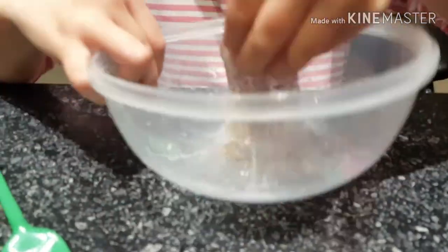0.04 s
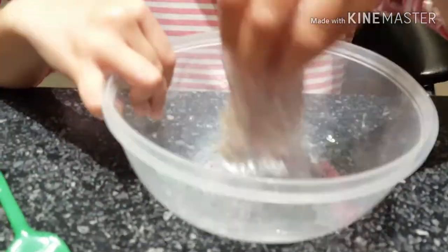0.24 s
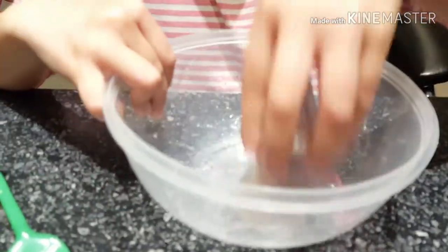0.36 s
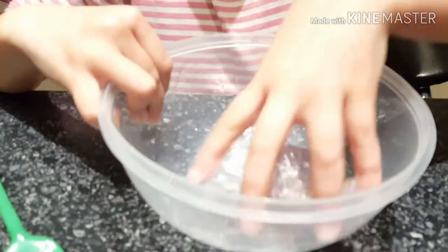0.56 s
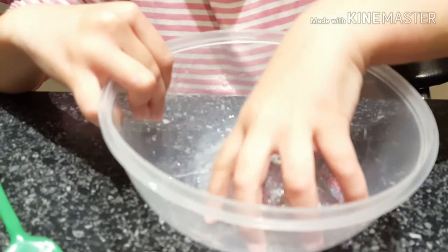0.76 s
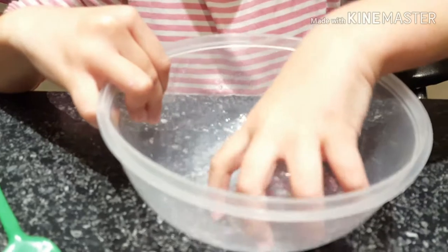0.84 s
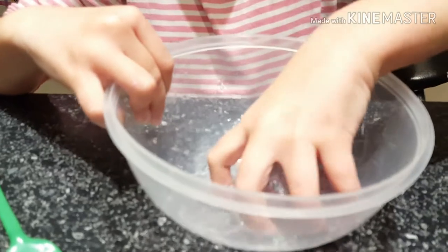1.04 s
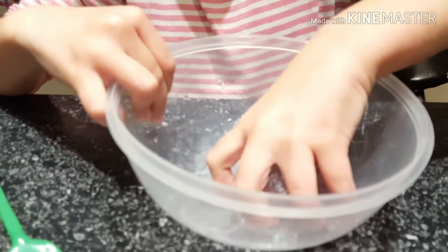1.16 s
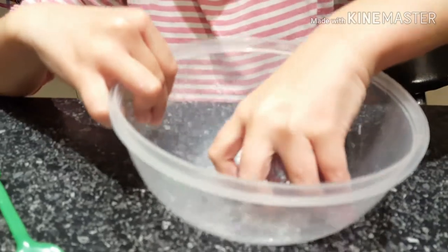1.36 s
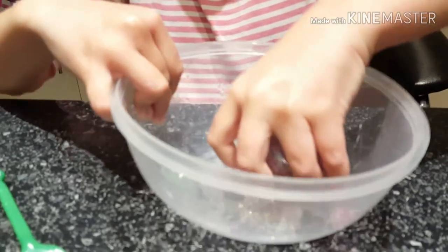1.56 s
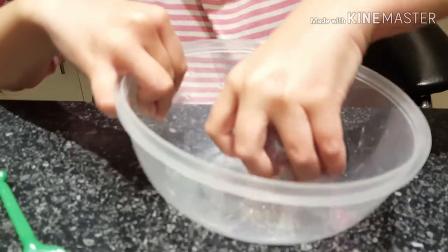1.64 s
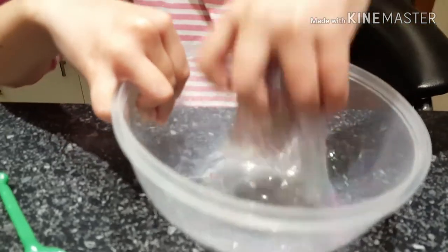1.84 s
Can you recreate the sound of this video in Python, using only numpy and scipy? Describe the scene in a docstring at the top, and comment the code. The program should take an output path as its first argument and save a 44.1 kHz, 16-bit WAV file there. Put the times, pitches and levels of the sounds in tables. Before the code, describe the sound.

Slime is kneaded by hand in a plastic bowl on a stone counter, heard close in a lively room with very faint hush. Faint pops and a thin squeaky squelch lead to a loud, hollow pop at 0.22 s with a low thump. Soft rubbing and sticky crackle follow, with small pops near 0.8, firmer ones at 1.0 and 1.6, then wet squelches from 1.8 over rising crackle.

```python
"""A hand kneads soft slime in a plastic bowl on a stone counter, in a bare, lively room with a low hush.
Two faint pops lead to a wet squelch with a thin squeak; then the loudest pop rings the bowl and thumps
its base, and the rub and crackle of kneading swell. Softer pops, presses and squelches follow, firmer
near 1.0 and 1.6 s, up to a last run of squelches over rising crackle. Pops are damped sines with noise
ticks and struck modes; squelches are bubble blips and filtered grains; rub and hush are filtered noise."""
import sys
import numpy as np
from scipy import signal
from scipy.fft import rfft, irfft, next_fast_len
from scipy.io import wavfile

SR = 44100
rng = np.random.default_rng(int(sys.argv[2]) if len(sys.argv) > 2 else 0)


def to_wav(s):
    """Save 16-bit WAV."""
    ch = np.atleast_2d(s).T  # columns
    pcm = np.round(np.clip(ch, -1, 1) * 32767)  # PCM
    wavfile.write(sys.argv[1], SR, pcm.astype(np.int16))


N = 83790  # length in samples

# All t60 values and lives in cycles run to -60 dB.
BURST_S = 0.007  # a short sound at 0 dB has the energy of this long at rms 1
POP_CYCLES = 5.9
SCATTER_DB, SCATTER_T60_S = 12, 0.023  # echoes inside the bowl, relative to the pop
TICK_T60_S = 0.016
DIRECT_TICK_DB, DIRECT_T60_S = 0, 0.0047  # first crack, alike in both ears, relative to the wide tick
BASE_TOP_HZ = 700  # the bowl's base rings below this, its wall above
MODE_SCATTER_DB, MODE_SCATTER_RAD = 5.5, 0.84  # the phase scatter narrows where the ears are alike
BOWL_RISE_S, THUMP_RISE_S, PRESS_RISE_S = 0.00069, 0.009, 0.0067
WALL_ECHO_DB, WALL_ECHO_SPAN_S = -20.5, (0.006, 0.036)  # all echoes together; earliest and latest
BUBBLES_PER_S, BUBBLE_CYCLES, BUBBLE_SPREAD = 1500, 12.8, 0.09  # spread: pitch scatter as a share
GRAINS_PER_S, GRAIN_SPREAD_DB = 4000, -1
SQUEAK_WIDTH_HZ, SQUEAK_EDGE_S = 125, 0.0078  # distance from pitch to half amplitude; fade at each end
HUSH_DB = -69.5
ROOM_DB, ROOM_RISE_S = -4.5, 0.0034  # level ahead of the room's colour
LOW_CUT_HZ, TOP_HZ = 46, 15500

# left-right likeness of diffuse sound: f/Hz, likeness (1 = the same in both ears)
ALIKE = [(100, 0.83), (250, 0.73), (500, 0.45), (1000, 0.2), (4000, 0.13), (10000, 0.12)]


def pops():
    """Each pocket snaps open, echoes inside the bowl, rings its wall and base and thumps the counter."""
    # air pockets bursting: t/s, pop pitch f/Hz, pop level/dB, treble tick level/dB, tick roll-off f/Hz,
    # wall ring level/dB, base knock level/dB, counter thump level/dB, left-right level/dB
    pockets = [(0.0606, 1490, -47, -55, 15500, -72, -73, -89, 2.5),
               (.1795, 1670, -52.5, -62, 15000, -71, -56, -77, -1),
               (0.2248, 2850, -20.5, -30.5, 14900, -18.5, -19.5, -21.5, 0.5),
               (0.2385, 3500, -37, -58, 10000, -63, -24.5, -35, 2.5),
               (.437, 3000, -54, -68, 9000, -53.5, -49, -52.5, 0),
               (0.4968, 2930, -47, -62, 11000, -57.5, -50, -49, -1.5),
               (0.787, 3340, -43.5, -56.5, 9000, -49, -54, -46, -4),
               (0.8393, 3600, -40.5, -48, 10000, -44, -43, -36, 1.5),
               (.886, 1470, -52.5, -63, 10000, -55, -56, -51, -6.5),
               (1.0197, 3710, -35, -41, 8540, -31, -35, -41.5, 1),
               (1.0454, 2440, -44.5, -57, 9000, -48.5, -43, -41.5, 1.5),
               (1.214, 3300, -53, -67, 9000, -56, -57, -43, 1),
               (1.229, 3460, -54, -77, 9010, -54.5, -62, -46.5, -2),
               (1.2686, 3160, -54.5, -59, 13900, -83, -63, -54, 1),
               (1.363, 2080, -59, -71, 7000, -60, -58.5, -60, 4),
               (1.5113, 1970, -54, -65.5, 10100, -56, -56.5, -55.5, -2),
               (1.6015, 3020, -33, -48.5, 5240, -34, -30, -32, 1),
               (1.617, 2800, -43.5, -55, 6000, -55, -37, -37, -5.5),
               (1.6247, 6400, -59, -56, 15000, -47, -72, -75, 6),
               (1.738, 2330, -51, -66.5, 7950, -51.5, -52.5, -53, -1)]
    # colour of the treble tick: f/Hz, level/dB
    tick_colour = [(1000, -54), (4000, -5), (6300, 1.5), (10000, 3), (13000, -3), (16000, -4)]
    # modes of the bowl, damped by slime, ahead of the grip: f/Hz, relative level/dB, t60/s
    bowl_modes = [(225, -16.5, 0.21), (303.6, -0.5, 0.078), (369, 1.5, 0.08), (479, -2.5, 0.05),
                  (516, -12, 0.083), (590, -1.5, 0.04), (861, -16, 0.18), (936, -3, 0.13), (1010, 3, 0.11),
                  (1062, -1.5, 0.2), (1263, -11.5, 0.065), (1420, -11, 0.13), (2254, -9, 0.1),
                  (2496, 6.5, 0.013), (3243, -14.5, 0.078)]
    # the hand damping the bowl: t/s, how many times faster its ring dies
    grip_curve = [(.2, 1), (1.0, 2.6), (1.6, 1.88)]
    # colour the bowl's cavity gives a pop: f/Hz, level/dB
    cavity = [(100, 3), (500, 5), (1400, 5.5), (1900, 1.5), (2400, 4), (3300, -0.5), (4300, 6),
              (5100, -0.5), (6200, 3), (9000, -20), (16000, 17)]
    out = np.zeros((2, N))
    t = np.arange(SR // 2) / SR

    def dying_noise(t60):
        """Two unrelated noises, left and right, fading away exponentially."""
        return rng.standard_normal((2, len(t))) * amp(-60 * t / t60)

    for s, hz, pop_db, tick_db, top_hz, wall_db, base_db, thump_db, pan_db in pockets:
        grip = np.interp(s, *np.transpose(grip_curve))
        modes = [(f, db, t60 / grip) for f, db, t60 in bowl_modes]
        base = [m for m in modes if m[0] < BASE_TOP_HZ]
        wall = [m for m in modes if m[0] >= BASE_TOP_HZ]

        pop = -ring(t, hz, POP_CYCLES / hz)
        echoes = signal.fftconvolve(dying_noise(SCATTER_T60_S), pop[None], axes=1)[:, :len(t)]
        pop_in_bowl = coloured(burst(pop) + amp(SCATTER_DB) * burst(echoes), cavity)
        snap = amp(pop_db) * burst(pop_in_bowl)

        wide_crack = burst(spread(dying_noise(TICK_T60_S)))
        direct_crack = amp(DIRECT_TICK_DB) * burst(dying_noise(DIRECT_T60_S)[0])
        tick = filtered(wide_crack + direct_crack,
                        lambda f: amp(along(tick_colour, f)) / np.sqrt(1 + (f / top_hz) ** 4))

        body = amp(wall_db) * bowl(t, wall) + amp(base_db) * bowl(t, base)
        body = body + amp(thump_db) * thump(t, THUMP_RISE_S)
        sound = near_walls(snap + amp(tick_db) * burst(tick)) + body
        pan = amp([[pan_db / 2], [-pan_db / 2]])
        add(out, in_room(sound) * pan, s)
    return out


def bowl(t, modes):
    """Modes struck anew: level and phase differ a little from blow to blow and from ear to ear."""
    out = np.zeros((2, len(t)))
    for k, (hz, db, t60) in enumerate(modes):
        size, phase = rng.standard_normal((2, 2, 1))
        turn = MODE_SCATTER_RAD * (1 - along(ALIKE, hz)) * phase
        level = amp(db + MODE_SCATTER_DB * size - 60 * t / t60)
        out += (-1) ** k * level * np.sin(2 * np.pi * hz * t + turn)  # neighbours start in opposite phase
    return burst(out * (1 - np.exp(-t / BOWL_RISE_S)))


def thump(t, rise_s):
    """The low boom of the bowl pushed against the counter: damped sines with a soft onset."""
    # modes of bowl and counter together: f/Hz, relative level/dB, t60/s
    counter = [(117, 2.5, 0.067), (140.1, 0, 0.087)]
    boom = -sum(amp(db) * ring(t, hz, t60) for hz, db, t60 in counter)
    return burst(boom * (1 - np.exp(-t / rise_s)))


def near_walls(x):
    """x with eight distinct early echoes from nearby walls, at random delays and gains."""
    out = x.copy()
    delays = rng.uniform(*WALL_ECHO_SPAN_S, 8)
    echo_gains = rng.standard_normal((8, 2, 1)) / np.sqrt(8)
    for delay, gains in zip(delays, echo_gains):
        i = max(round(delay * SR), 1)
        out[:, i:] += amp(WALL_ECHO_DB) * gains * x[:, :-i]
    return out


def squelches():
    """Short swells of tiny bubbles, wet squish and fizz as the fingers close."""
    # slime squeezed between fingers: centre t/s, swell width (standard deviation) t/s,
    # bubble pitch f/Hz, bubble level/dB, squish level/dB, fizz level/dB
    squeezes = [(0.195, 0.0057, 725, -51.5, -49, -52), (0.22, 0.008, 1070, -40.5, -43.5, -52.5),
                (0.531, 0.0057, 3560, -57.5, -68, -68), (.602, 0.0064, 3570, -62, -55.5, -69),
                (.864, 0.0074, 3220, -52, -51, -52.5), (1.174, 0.013, 3530, -61, -72, -64),
                (1.2, 0.0072, 3440, -57.5, -52, -63), (1.233, 0.0095, 3430, -58, -56.5, -65),
                (1.385, 0.023, 2300, -70, -65.5, -71), (1.787, 0.0077, 1430, -56, -49.5, -66),
                (1.801, 0.0067, 1450, -48.5, -46, -56.5), (1.835, 0.01, 2960, -47.5, -48, -55),
                (1.896, 0.0059, 2950, -48, -43.5, -49)]
    # colour of the squish: f/Hz, level/dB
    squish_colour = [(100, -5), (400, -6), (700, 9), (1100, 1), (1550, 4.5), (2000, 0.5), (3200, -4),
                     (5000, -4.5), (8000, -21), (16000, -59)]
    # colour of the fizz: f/Hz, level/dB
    fizz_colour = [(500, -20), (3000, -7), (6000, -11.5), (11000, -1), (16000, -2.5)]
    t = np.arange(N) / SR
    blips, squish, fizz = np.zeros((2, N)), np.zeros(N), np.zeros(N)
    for s, width, hz, bubble_db, squish_db, fizz_db in squeezes:
        swell = np.exp(-0.5 * ((t - s) / width) ** 2)
        blips += amp(bubble_db) * swell * bubbles(hz)
        squish += amp(squish_db) * swell
        fizz += amp(fizz_db) * swell
    return spread(blips) + squish * grains(squish_colour) + fizz * grains(fizz_colour)


def bubbles(hz):
    """A stream of tiny bursting bubbles, each a damped sine near one pitch, rms 1."""
    count = round(BUBBLES_PER_S * N / SR)
    start = rng.integers(0, N, (count, 1))
    pitch, left, right = rng.standard_normal((count, 3)).T[..., None]
    f = hz * np.exp(BUBBLE_SPREAD * pitch)
    k = np.arange(SR // 120)
    blips = ring(k / SR, f, BUBBLE_CYCLES / f)
    places = (start + k).ravel()
    ears = [np.bincount(places, (blips * size).ravel(), N)[:N] for size in (left, right)]
    return unit(np.array(ears))


def grains(spectrum):
    """Dense tiny clicks of uneven size, rms 1."""
    clicks = (rng.random((2, N)) < GRAINS_PER_S / SR) * rng.standard_normal((2, N))
    sizes = amp(GRAIN_SPREAD_DB * np.clip(rng.standard_normal(N), -2, 2))
    return unit(coloured(spread(clicks * sizes), spectrum))


def squeaks():
    """Narrow, unsteady tones of stretched slime and dragging skin: noise through a sharp resonance."""
    # air squeezed through thin slime, skin dragging on the bowl: start t/s, length t/s, f/Hz, level/dB
    drags = [(0.176, 0.052, 1640, -54.5), (1.511, 0.074, 2040, -65.5), (1.627, 0.15, 2200, -57.5),
             (1.732, 0.054, 694, -54.5)]
    out, t = np.zeros((2, N)), np.arange(N) / SR
    for s, length, hz, db in drags:
        noise = spread(rng.standard_normal((2, N)))
        tone = unit(filtered(noise, lambda f: 1 / (1 + ((f - hz) / SQUEAK_WIDTH_HZ) ** 2)))
        fade = np.clip(np.minimum(t - s, s + length - t) / SQUEAK_EDGE_S, 0, 1)
        out += amp(db) * tone * fade
    return out


def presses():
    """Dull bumps without a pop, the counter boom alone."""
    # soft presses of the hand on the base: t/s, level/dB
    bumps = [(.137, -56), (.278, -33), (0.611, -50.5), (0.719, -53), (1.656, -46)]
    out = np.zeros((2, N))
    t = np.arange(SR // 4) / SR
    for s, db in bumps:
        add(out, amp(db) * thump(t, PRESS_RISE_S)[None], s)
    return out


def kneading():
    """Faint sticky crackle of grains, and the dull rub of the hand on the bowl as low noise."""
    # level curves of steady kneading: t/s, wet crackle level/dB, low rubbing level/dB
    knead = [(0, -63, -61), (.15, -66.5, -62.5), (.3, -53.5, -41.5), (.44, -59, -58.5), (.56, -60.5, -60),
             (.63, -60.5, -62), (.73, -63.5, -59.5), (.8, -60, -63.5), (.9, -61, -56.5), (.99, -57.5, -64),
             (1.149, -59, -61.5), (1.3, -70, -62.5), (1.42, -68, -58), (1.48, -69.5, -62),
             (1.56, -63.5, -60.5), (1.7, -61.5, -55), (1.9, -51, -68)]
    # colour of the crackle: f/Hz, level/dB
    crackle_colour = [(200, 6), (700, -1.5), (1500, -3), (2400, -3), (3800, -4), (5500, -14), (11000, -16),
                      (16000, -21.5)]
    # colour of the rub: f/Hz, level/dB
    rub_colour = [(25, -36), (60, -4), (130, -5.5), (200, -5.5), (280, -4.5), (500, -15), (1200, -18),
                  (4000, -62)]
    s, *levels = np.transpose(knead)
    crackle_db, rub_db = [np.interp(np.arange(N) / SR, s, level) for level in levels]
    rub = unit(coloured(spread(rng.standard_normal((2, N))), rub_colour))
    return amp(crackle_db) * grains(crackle_colour) + amp(rub_db) * rub


def hush():
    """The steady hush of the room: wide coloured noise."""
    # colour of the hush: f/Hz, level/dB
    hush_colour = [(25, 16), (60, -18), (130, -30), (350, -23), (1000, -14), (2000, 0), (5000, -16.5),
                   (12000, -12), (16000, -7)]
    return amp(HUSH_DB) * unit(coloured(spread(rng.standard_normal((2, N))), hush_colour))


def in_room(x):
    """A stereo sound plus the room's answer, each frequency dying at its own speed."""
    # decay of the room: f/Hz, t60/s
    room_t60 = [(100, 0.17), (300, 0.28), (1000, 0.43), (4000, 0.39), (13000, 0.28)]
    # colour of the room's answer: f/Hz, level/dB
    room_colour = [(40, 3), (130, -2.5), (350, 0), (1000, -0.5), (2500, -3.5), (6000, -2), (14000, -1)]
    noise = spread(rng.standard_normal((2, SR // 2)))
    hz, t, bands = signal.stft(noise, SR, nperseg=256)
    fade = amp(-60 * t / along(room_t60, hz)[:, None])
    rise = 1 - np.exp(-t / ROOM_RISE_S)
    tail = signal.istft(bands * fade * rise, SR, nperseg=256)[1]
    tail = coloured(tail / np.linalg.norm(tail[0]), room_colour)
    return x + amp(ROOM_DB) * signal.fftconvolve(x, tail, axes=1)[:, :x.shape[1]]


def amp(db):
    """Decibels to amplitude."""
    return 10 ** (np.asarray(db) / 20)


def unit(x):
    """x scaled to rms 1."""
    return x / np.sqrt(np.mean(x ** 2) + 1e-20)


def burst(x):
    """Scale a short sound to the energy of BURST_S seconds at rms 1, each channel by itself."""
    return x / np.sqrt(np.sum(x ** 2, axis=-1, keepdims=True) / (BURST_S * SR) + 1e-20)


def along(points, hz):
    """Read a curve of (f/Hz, value) points on a log frequency axis."""
    f, v = np.transpose(points)
    return np.interp(np.log(hz + 1), np.log(f + 1), v)


def filtered(x, response):
    """x with its spectrum multiplied by a response of frequency."""
    n = x.shape[-1]
    m = next_fast_len(n + 2048, True)  # padded against wrap-around
    return irfft(rfft(x, m) * response(np.fft.rfftfreq(m, 1 / SR)), m)[..., :n]


def coloured(x, spectrum):
    """x with the given (f/Hz, level/dB) colour."""
    return filtered(x, lambda hz: amp(along(spectrum, hz)))


def spread(pair):
    """Two unrelated signals as left and right, most alike in the bass."""
    def mid_side_gains(hz):
        """Mid and side shares that give the wanted likeness."""
        turn = np.arccos(np.clip(along(ALIKE, hz), -1, 1)) / 2
        return np.array([np.cos(turn), np.sin(turn)])

    mid, side = filtered(pair, mid_side_gains)
    return np.array([mid + side, mid - side])


def ring(t, hz, t60):
    """A damped sine."""
    return np.sin(2 * np.pi * hz * t) * amp(-60 * t / t60)


def add(out, x, s):
    """Mix x into out from time s."""
    i = max(round(s * SR), 0)
    out[:, i:i + x.shape[1]] += x[:, :max(N - i, 0)]


def scene():
    """Slime and bowl in the room, over its hush; each pop brings its own room answer."""
    hand = squelches() + squeaks() + presses() + kneading()
    return pops() + in_room(hand) + hush()


def record(dry):
    """The microphone thins the deep bass; a steep roll-off closes the top of the band."""
    thin = signal.sosfilt(signal.butter(2, LOW_CUT_HZ, "high", fs=SR, output="sos"), dry)
    return filtered(thin, lambda hz: 1 / (1 + (hz / TOP_HZ) ** 90))


dry = scene()
out = record(dry)
to_wav(out)
```